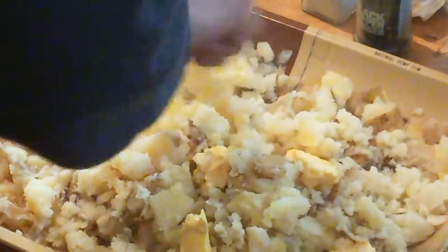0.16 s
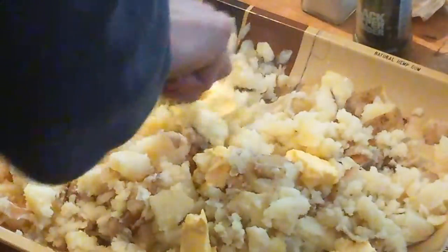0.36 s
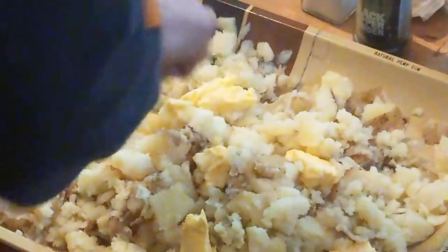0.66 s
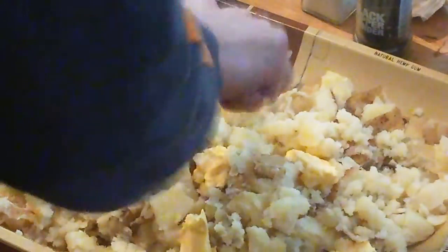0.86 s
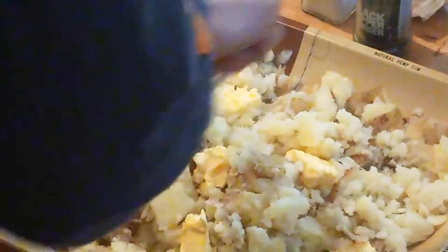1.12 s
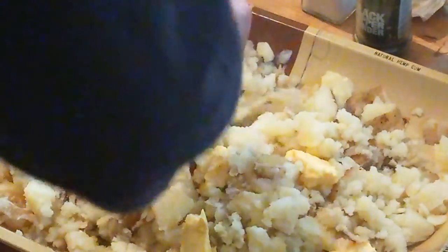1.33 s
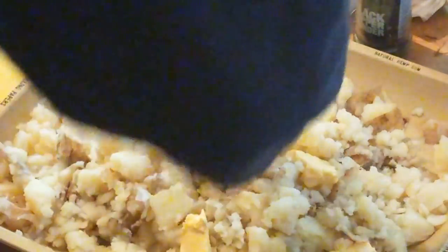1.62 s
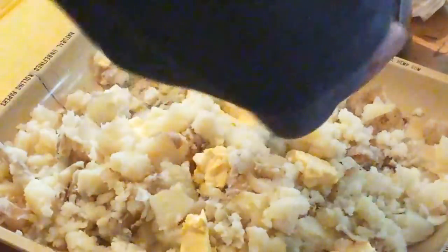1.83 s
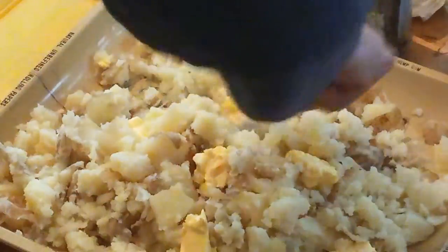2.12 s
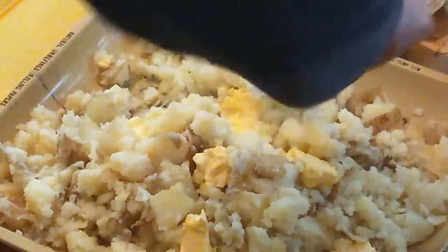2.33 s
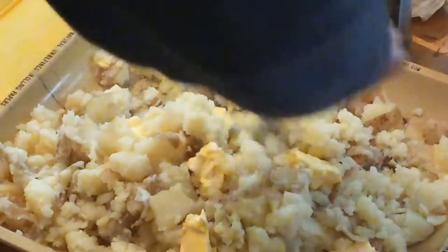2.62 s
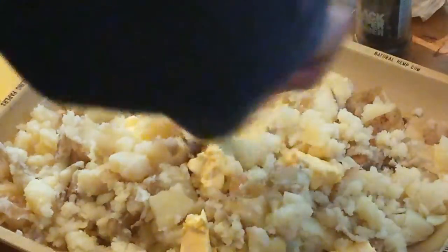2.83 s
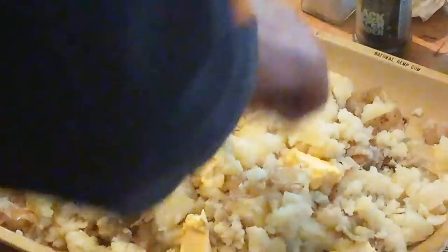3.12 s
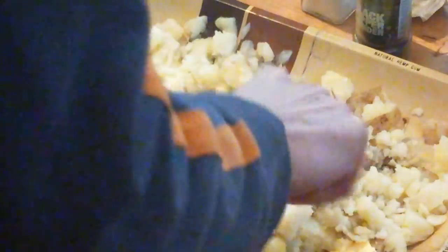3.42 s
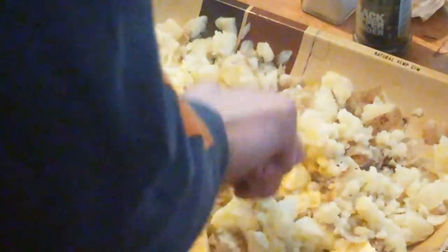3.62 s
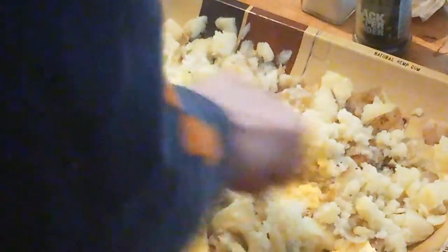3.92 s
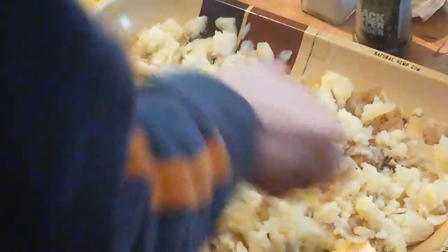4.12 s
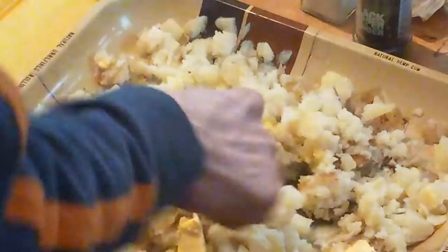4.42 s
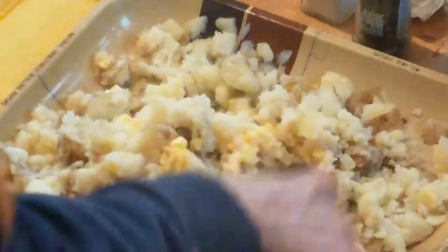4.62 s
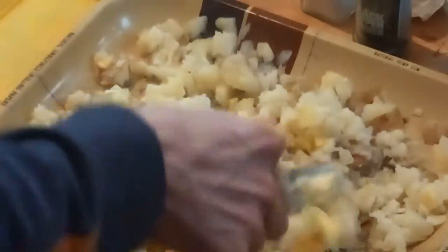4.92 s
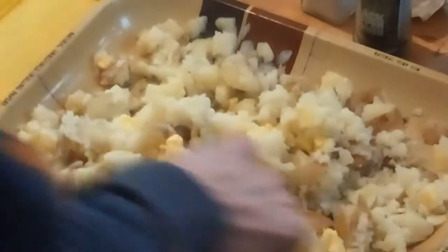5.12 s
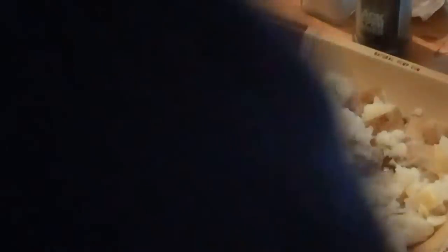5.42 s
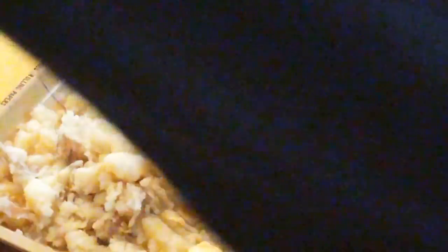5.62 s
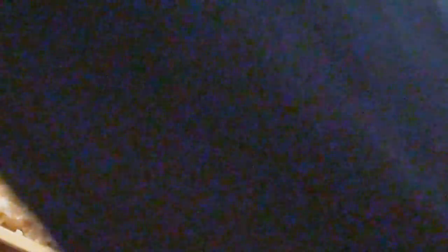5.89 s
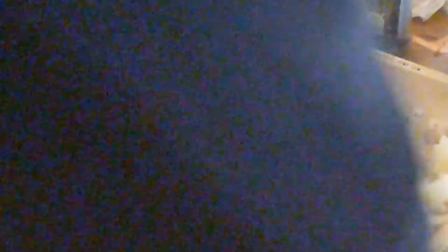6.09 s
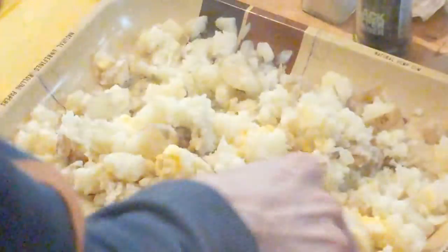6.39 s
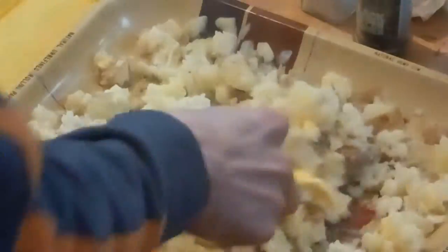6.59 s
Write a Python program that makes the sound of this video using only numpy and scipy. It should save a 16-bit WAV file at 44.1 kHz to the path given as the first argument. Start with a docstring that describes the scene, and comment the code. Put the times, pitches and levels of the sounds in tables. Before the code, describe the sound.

Close up in a small kitchen, a fork knocks five times through soft potatoes onto the bottom of a tray, which thuds and rings briefly. After that the fork presses and slides through the wet mash, making quiet, sticky squelches and little air pops with pauses between them. The tray softly thumps the counter twice in the later part, and an appliance hums faintly throughout.

```python
"""A metal fork mashes boiled potatoes and butter in a tray on a kitchen counter.
Five stabs crunch through to the bottom and knock the tray, which thuds and rings. Then the fork
presses, slides and pulls out of the wet mash: tiny wet films snap in a squelch, the mash swishes faintly,
air pockets pop and the tray bumps the counter. The small room echoes, over a low appliance hum."""
import sys
import numpy as np
from scipy import signal
from scipy.fft import rfft, irfft
from scipy.io import wavfile
from scipy.ndimage import uniform_filter1d

SR = 44100
rng = np.random.default_rng(int(sys.argv[2]) if len(sys.argv) > 2 else 0)


def bounce(signal):
    """Save signal as a 16-bit WAV file at the path given by the first command-line argument."""
    frames = np.transpose(np.atleast_2d(signal))
    limited = np.clip(frames, -1, 1)
    pcm = np.round(limited * 32767).astype(np.int16)
    wavfile.write(sys.argv[1], SR, pcm)


N = 297675
TIME = np.arange(N) / SR
EVENT_TIME = TIME[:SR // 2]  # half a second, room for one short sound

# tone of a spray of tiny wet clicks: (frequency [Hz], relative level [dB])
WET_SPRAY = [(100, -12.5), (1100, -10.5), (1900, -12.5), (3300, -1), (4400, -8), (5800, -5), (7000, -4.5),
             (9000, -3.5), (10000, -9.5), (12200, -4), (16000, -9)]


def amp(db):
    """Turn decibels into a number to multiply by."""
    return 10 ** (np.asarray(db) / 20)


def unit(x):
    """Scale a sound to an average (rms) level of 1."""
    return x / np.sqrt(np.mean(x ** 2) + 1e-20)


def add(track, s, x):
    """Mix a stereo sound into a track, starting at s seconds."""
    i = max(int(s * SR), 0)
    track[:, i:i + x.shape[1]] += x[:, :N - i]


def curve_db(points, size):
    """Join (frequency [Hz], level [dB]) points into a level for every frequency."""
    hz, db = np.transpose(points)
    return np.interp(np.log(np.fft.rfftfreq(size, 1 / SR) + 1), np.log(hz), db)


def filtered(x, hz, kind="low", order=2):
    """Keep what is below hz ("low"), above it ("high") or between two values ("band")."""
    return signal.sosfilt(signal.butter(order, hz, kind, fs=SR, output="sos"), x)


def response(points, size=4096):
    """A short tap whose tone follows (frequency [Hz], level [dB]) points."""
    cepstrum = irfft(np.log(amp(curve_db(points, size))))
    tap = irfft(np.exp(rfft(2 * cepstrum[:size // 2], size) - cepstrum[0]))  # packs energy at the start
    return tap / np.linalg.norm(tap)


def noise(points):
    """Steady noise whose tone follows (frequency [Hz], level [dB]) points."""
    return unit(signal.fftconvolve(rng.standard_normal(N), response(points))[:N])


def diffuse(mid, side):
    """Sound from all around: mid is what both ears share, side is how they differ."""
    # stereo width: (frequency [Hz], gain of the side signal [dB])
    width = [(60, -9), (200, -10), (380, -5.5), (550, -2), (1300, 1), (5200, 1.5), (8500, -11),
             (15000, -9.5)]
    side = irfft(rfft(side) * amp(curve_db(width, len(mid))), len(mid))
    return np.array([mid + side, mid - side])


def air_and_hum(air_db=-65.5):
    """Steady room air with the hum of an appliance."""
    # tone of the room air: (frequency [Hz], relative level [dB])
    air_tone = [(32, -39.5), (55, -10.5), (102, -5), (189, -14), (234, -4.5), (263, -19), (304, -14),
                (376, -23.5), (404, -19.5), (767, -25), (949, -22), (1150, -30.5), (1320, -35.5),
                (9270, -42.5), (16000, -47)]
    # the appliance's steady notes: (pitch [Hz], average level [dB])
    hum_notes = [(99.5, -73.5), (236, -83.5), (293, -84.5)]
    hum = sum(amp(db) * np.sqrt(2) * np.sin(2 * np.pi * (hz * TIME + rng.random()))
              for hz, db in hum_notes)
    air = diffuse(noise(air_tone), noise(air_tone))
    return amp(air_db) * filtered(air, 58, "high", order=6) + hum  # no deep rumble indoors


def knocks(thud_db=7, ring_db=7, crunch_db=-27, crunch_s=.0031, tine_count=4):
    """The fork's tines (prongs) crunch through potato and land with a dead thud; the tray rings on."""
    # stabs that hit the tray bottom: (time [s], strength [dB], extra crunch [dB], extra ring [dB])
    stabs = [(0.038, -11.5, -5.5, 0), (0.326, -6.5, -8.5, -2), (0.624, -3.5, -8.5, 0.5),
             (0.9438, -1.36, -1.5, -0.5), (1.318, -3, -8.5, -0.5)]
    # tone of the thud through the mash: (frequency [Hz], relative level [dB])
    thud_tone = [(30, -28), (70, -17.5), (130, -25.5), (200, 3), (380, -4), (500, 1.5), (730, -2),
                 (980, 4.5), (1350, -11), (1900, -12), (3000, -22), (4500, -28), (16000, -54.5)]
    out, thud = np.zeros((2, N)), response(thud_tone)
    spray = filtered(response(WET_SPRAY), 9000)  # buried tines sound duller
    for s, db, wet_db, tray_db in stabs:
        blow = amp(ring_db + tray_db) * tray_ring()
        blow[:len(thud)] += amp(thud_db) * thud
        add(out, s, in_room(amp(db) * blow, room_db=1.5))
        crunch_gain = amp(db + crunch_db + wet_db) / np.sqrt(tine_count)
        for _ in range(tine_count):  # each tine crunches on its own spot
            add(out, s, in_room(crunch_gain * through(spray, snap(crunch_s))))
        # the tray's walls sway, pushing air to one side as they pull it from the other
        sway = amp(db + tray_db) * tray_ring()
        add(out, s, diffuse(np.zeros(len(sway)), sway))
    return out


def tray_ring():
    """The struck tray rings with many fading notes; how they line up depends on the spot that is hit."""
    # notes of the tray on the counter: (pitch [Hz], relative level [dB], time to fade by 60 dB [s])
    tray_notes = [(179.4, 1.5, 0.19), (201, -1.5, 0.17), (233, -12, 0.24), (240, -3.5, 0.071),
                  (280.2, -1, 0.15), (344.8, 2, 0.099), (432.2, -1, 0.073), (502, 3, 0.075),
                  (478, -9.5, 0.36), (543.5, -6, 0.34), (604, -11, 0.058), (660.6, 2, 0.082),
                  (834, -10, 0.16), (912.7, 2.5, 0.16), (940, 1, 0.033), (1047, -5.5, 0.027),
                  (1057, -10.5, 0.046), (1139, -6, 0.068), (1490, -9.5, .09), (1756, -8.5, 0.043)]
    t = EVENT_TIME
    ring = sum(amp(db - 60 * t / fade_s) * np.sin(2 * np.pi * (hz * t + rng.random()))
               for hz, db, fade_s in tray_notes)
    ring = filtered(ring, [130, 2500], "band", order=3)  # a small tray gives almost no deep bass
    return ring / np.linalg.norm(ring)


def crackle(outline, clicks_per_s=3500, scatter_db=5):
    """Wet films snap in tiny, uneven clicks; their loudness follows (time [s], gain) points."""
    s, gain = np.transpose(outline)
    t = EVENT_TIME[:int(s[-1] * SR)]
    luck = rng.random(len(EVENT_TIME))[:len(t)]
    direction, size = rng.standard_normal((2, len(EVENT_TIME)))[:, :len(t)]
    clicks = (luck < clicks_per_s / SR) * np.sign(direction) * amp(scatter_db * size)
    clicks = irfft(np.exp(1j * np.angle(rfft(clicks))), len(t))  # make all frequencies equally strong
    return unit(clicks) * np.interp(t, s, gain)


def snap(length_s, release_s=.007):
    """One short, dense burst of clicks."""
    return crackle([(0, 0), (length_s / 4, 1), (length_s * 3 / 4, 1),
                    (length_s, .5), (length_s + release_s, 0)])


def through(body, clicks):
    """Each click sets off a body's own short sound."""
    size = len(EVENT_TIME)
    return irfft(rfft(clicks, size) * rfft(body / np.linalg.norm(body), size), size)


def echoes(gap_s=.0095, early_s=.014, bass_fade_s=.29, treble_fade_s=.26, damping_hz=1600):
    """The counter echoes first; then the walls answer strongly and fade, the high notes soonest."""
    t = EVENT_TIME
    late = np.maximum(t - gap_s, 0)
    bounce_db = np.where(t < gap_s, -4, 4 * np.exp(-late / early_s))
    bounces = rng.standard_normal(len(t)) * amp(bounce_db)
    bass, treble = (rfft(bounces * amp(-60 * late / fade_s)) for fade_s in (bass_fade_s, treble_fade_s))
    spectrum = treble + (bass - treble) / (1 + (np.fft.rfftfreq(len(t), 1 / SR) / damping_hz) ** 2)
    # so many paths overlap that no broad range of pitches stands out
    pattern = irfft(spectrum / np.sqrt(uniform_filter1d(abs(spectrum) ** 2, size=40)), len(t))
    return pattern / np.linalg.norm(pattern)


def in_room(x, room_db=2.5):
    """A sound plus the kitchen's echoes, which differ for every spot it comes from."""
    t = EVENT_TIME
    paths = amp(room_db) * diffuse(echoes(), echoes()) * (t > .001) * np.cos(np.pi * t) ** 2
    paths[:, 0] = 1  # the straight path to the microphones
    return signal.fftconvolve(x[None], paths, axes=1)[:, :N]


def squelches(tug_db=-15, snap_s=.005):
    """The mash's seal snaps, then tears; the clicks ring an air pocket and the tines, and tug the tray."""
    # strokes through wet mash: (time [s], swell [s], hold [s], tear level [dB], snap level [dB],
    # top of the hiss [Hz], air pocket pitch [Hz], extra for the pocket [dB], extra for the tines [dB])
    strokes = [(1.628, .018, 0.064, -72, -78, 8950, 4330, -0.5, -17),
               (1.773, 0.009, 0.059, -69.5, -65.5, 8000, 2160, -7.5, -1.5),
               (2.17, 0.04, 0.015, -62.5, -60, 12000, 2200, -10, -8),
               (2.5038, 0.02, 0.014, -57, -52, 10000, 2500, -0.5, -8),
               (2.767, .013, 0.0077, -41, -54, 10600, 2300, -3.5, -7),
               (4.003, 0.035, 0.073, -75.5, -65.5, 13100, 5900, -1, -3),
               (4.36, .026, .017, -38.5, -53, 16000, 2330, -7, 1.5),
               (4.7202, .012, 0.06, -46, -34.5, 13770, 1950, -2, -6.5),
               (6.1043, 0.016, 0.032, -48.5, -45.5, 10500, 2340, -1, -7.5),
               (6.603, 0.0024, 0.0083, -54.5, -53, 11080, 1980, 0, -7)]
    out, spray = np.zeros((2, N)), response(WET_SPRAY)
    tray = filtered(tray_ring(), 650)  # soft mash passes mostly the low notes
    tines = short_ring(hz=8410, cycles=1.14)
    for s, swell_s, hold_s, tear_db, snap_db, hiss_hz, pocket_hz, pocket_db, tine_db in strokes:
        # what the clicks set off: (sound, relative level [dB], extra during the snap [dB])
        bodies = [(filtered(spray, hiss_hz), 0, 0),
                  (short_ring(pocket_hz, cycles=.65), pocket_db, -5.5),
                  (tines, tine_db, 4.5),
                  (tray, tug_db + pocket_db, -5.5)]
        wet = 0
        for body, body_db, extra_db in bodies:
            wet += amp(snap_db + body_db + extra_db) * through(body, snap(snap_s, release_s=.003))
            wet += amp(tear_db + body_db) * through(body, tear(swell_s, hold_s, tear_db))
        add(out, s, in_room(wet, room_db=-2.5))
    return out


def short_ring(hz, cycles):
    """A smothered ring that is loudest after the given number of cycles."""
    t = TIME[:SR // 50]
    return t * np.exp(-hz * t / cycles) * np.sin(2 * np.pi * hz * t)


def tear(swell_s, hold_s, db, release_s=.014, gentle_db=-68.5, hard_db=-40.5):
    """A longer crackle that swells, holds and lets go; the harder the stroke, the denser its clicks."""
    clicks_per_s = np.interp(db, [gentle_db, hard_db], [500, 2500])
    end_s = swell_s + hold_s
    outline = [(0, 0), (swell_s / 2, .42), (swell_s, 1), (end_s, 1), (end_s + release_s, 0)]
    return crackle(outline, clicks_per_s)


def soft_swishes(grain_db=2):
    """Faint, grainy hisses swell and fade as the fork slides through wet mash."""
    # slides of the fork: (middle time [s], half length [s], level [dB])
    slides = [(1.86, 0.082, -78.5), (3.632, 0.043, -72), (4.329, 0.028, -77.5), (5.14, 0.086, -80.5),
              (5.663, 0.076, -74), (6.087, 0.036, -74.5), (6.3, 0.051, -76.5), (6.595, .05, -70.5)]
    # tone of the swish: (frequency [Hz], relative level [dB])
    swish_tone = [(300, -31), (1500, -4.5), (3000, -5), (6000, -1.5), (8700, 4.5), (10200, -10.5),
                  (16000, 0.5)]
    swell = sum(amp(db) * np.exp(-.5 * ((TIME - s) / half_s) ** 2) for s, half_s, db in slides)
    grain = unit(uniform_filter1d(rng.standard_normal(N), size=200))
    return swell * amp(grain_db * grain) * noise(swish_tone)


def pulse(t, swell_s):
    """A loudness shape that rises to 1 at swell_s, then dies away."""
    return t / swell_s * np.exp(1 - t / swell_s)


def pops(glide_per_s=30):
    """Each bursting air pocket rings for a few cycles, rising in pitch as it opens."""
    # air pockets: (time [s], peak level [dB], starting pitch [Hz])
    pockets = [(2.525, -48, 2830), (2.7825, -31.5, 1890), (4.063, -51, 5700), (4.7616, -33, 2400),
               (4.777, -30, 2980), (4.782, -32.5, 1910), (6.614, -38.5, 1750)]
    out, t = np.zeros((2, N)), TIME[:SR // 50]
    for s, db, hz in pockets:
        rising_note = np.sin(2 * np.pi * hz * t * (1 + glide_per_s * t))
        add(out, s, in_room(amp(db) * pulse(t, swell_s=.0007) * rising_note, room_db=-6.5))
    return out


def bumps():
    """Pressing the mash down bumps the tray on the counter with a soft, low thump."""
    # thumps of the tray: (time [s], peak level [dB], pitch [Hz])
    thumps = [(4.73, -39, 184), (4.741, -46, 91.5), (4.741, -50.5, 413), (6.138, -53, 340),
              (6.199, -51.5, 197)]
    out, t = np.zeros((2, N)), TIME[:SR // 10]
    for s, db, hz in thumps:
        add(out, s, in_room(amp(db) * pulse(t, swell_s=.0049) * np.sin(2 * np.pi * hz * t)))
    return out


def scene():
    """Fork, tray and mash close to the microphones, in a small kitchen."""
    return knocks() + squelches() + pops() + bumps() + in_room(soft_swishes()) + air_and_hum()


def record(dry, top_hz=15900):
    """The two microphones differ a little in tone; the recorder cuts the very highest sounds."""
    # one microphone against the other: (frequency [Hz], left minus right [dB])
    balance = [(150, -2.5), (1000, 2.43), (2400, 2.5), (5000, -1.8), (9000, -2), (15000, -1.64)]
    lean_db = curve_db(balance, N)
    heard = irfft(rfft(dry) * amp(np.array([lean_db, -lean_db]) / 2), N)
    return signal.sosfilt(signal.ellip(10, .2, 80, top_hz, fs=SR, output="sos"), heard)


dry = scene()
out = record(dry)
bounce(out)
```